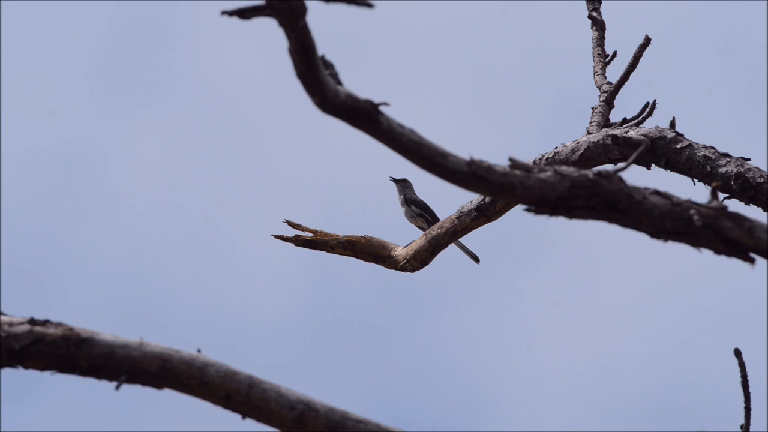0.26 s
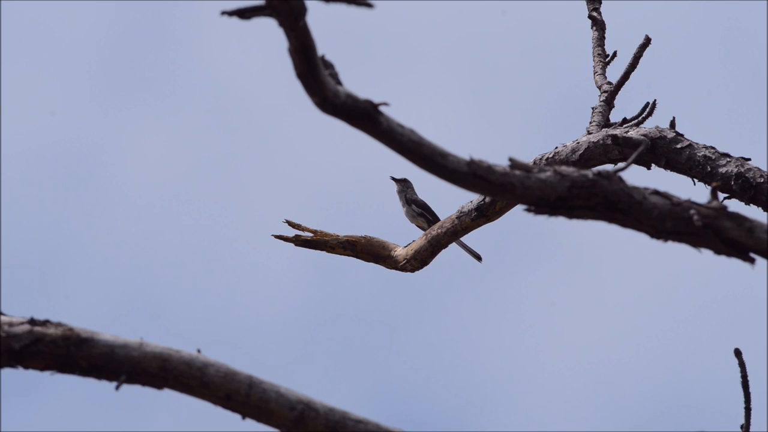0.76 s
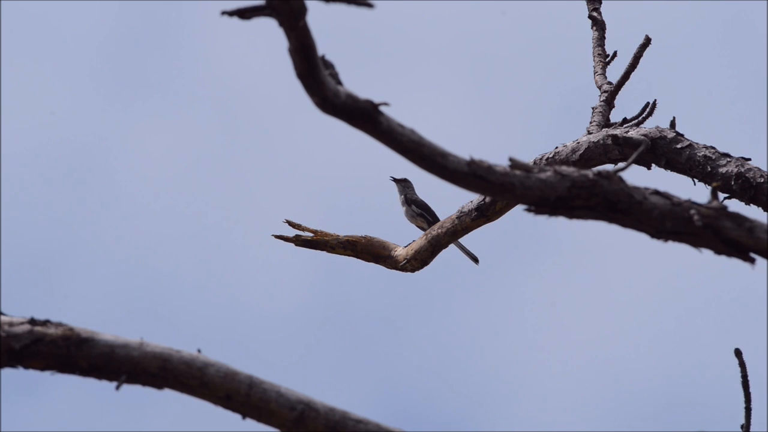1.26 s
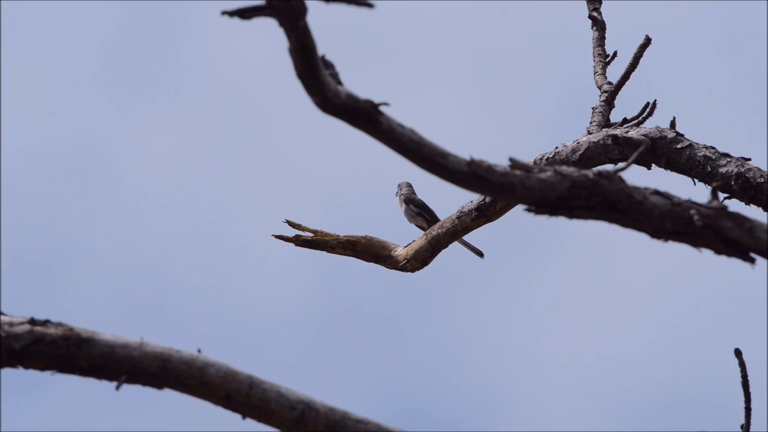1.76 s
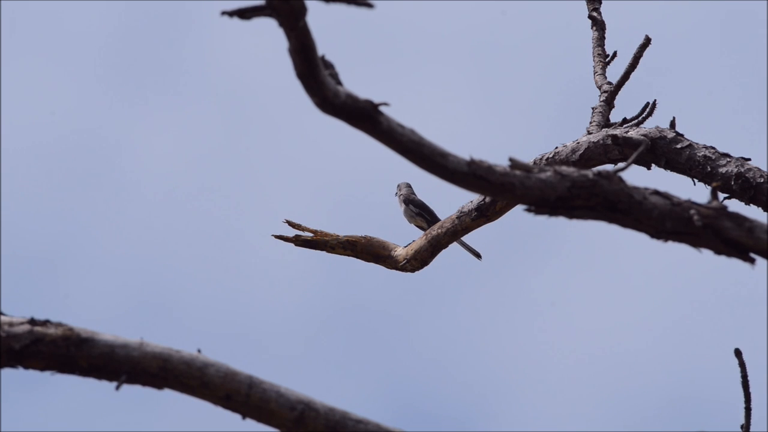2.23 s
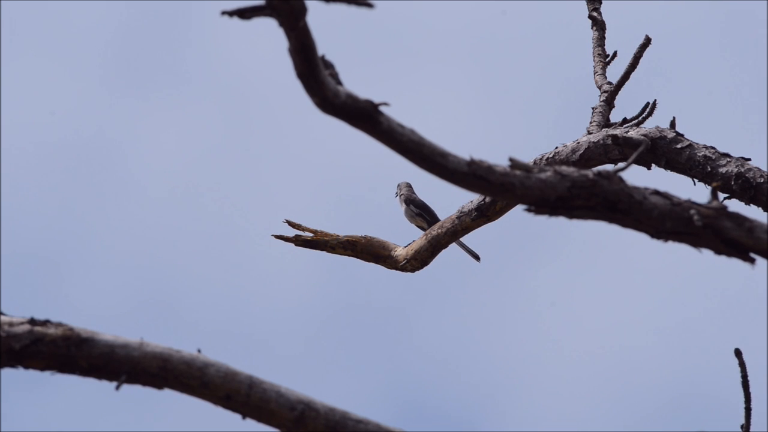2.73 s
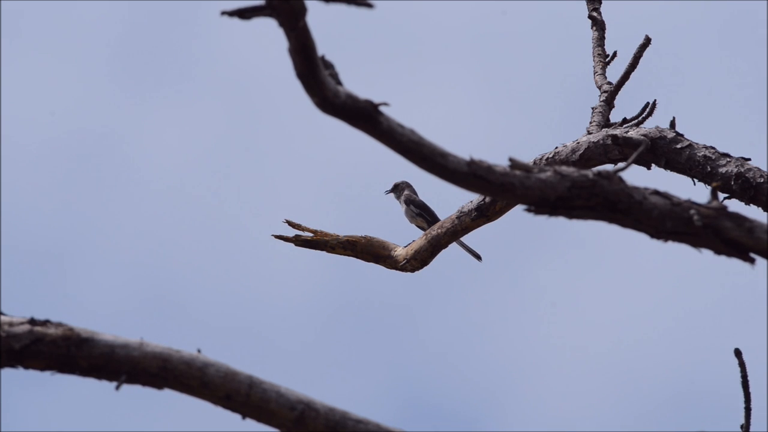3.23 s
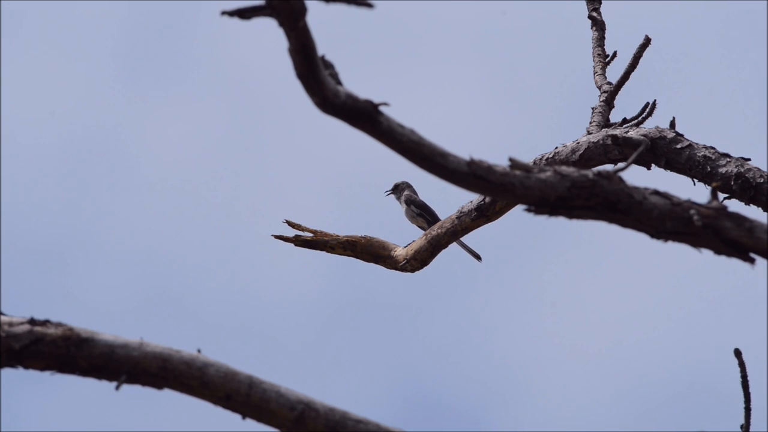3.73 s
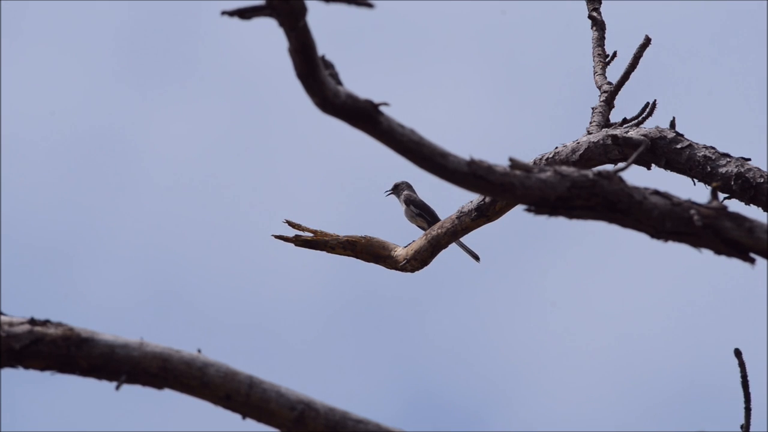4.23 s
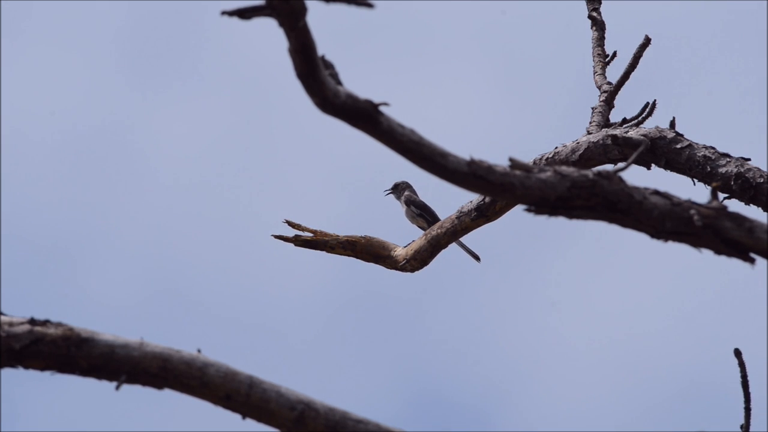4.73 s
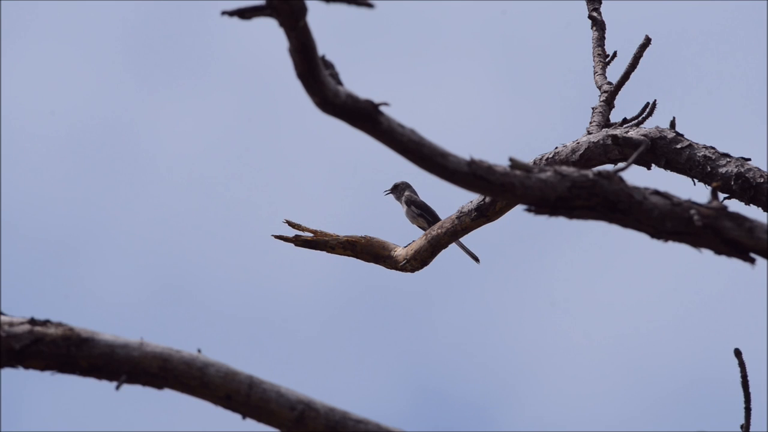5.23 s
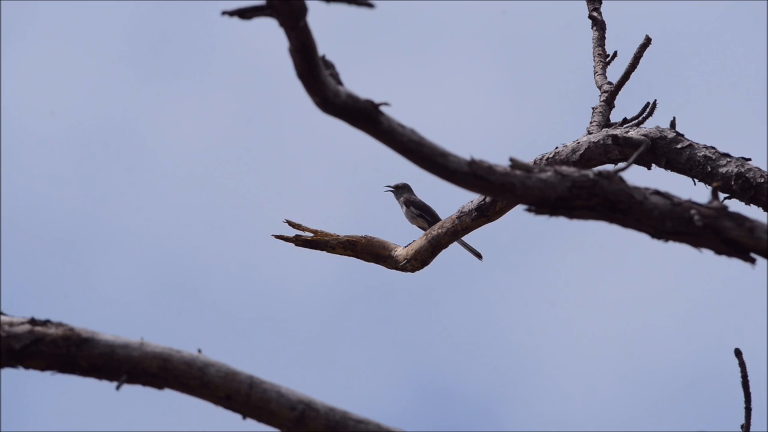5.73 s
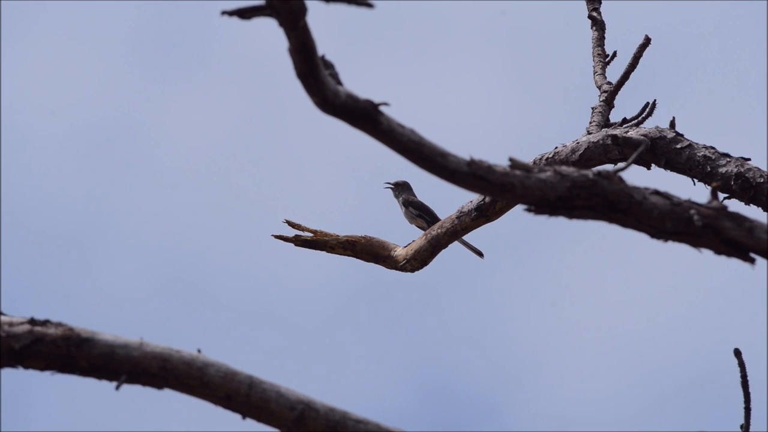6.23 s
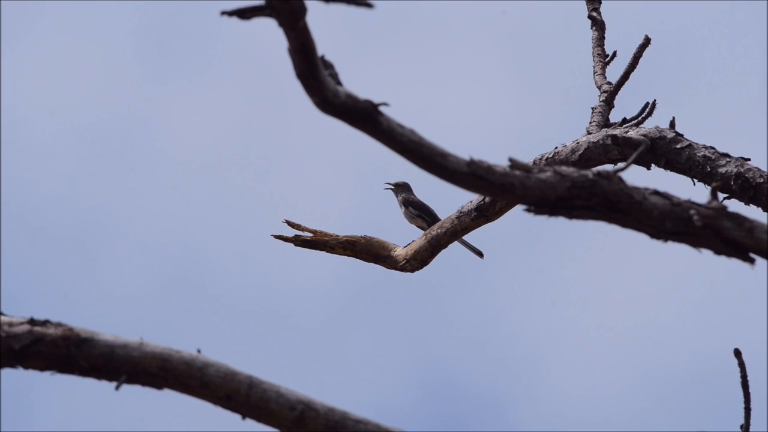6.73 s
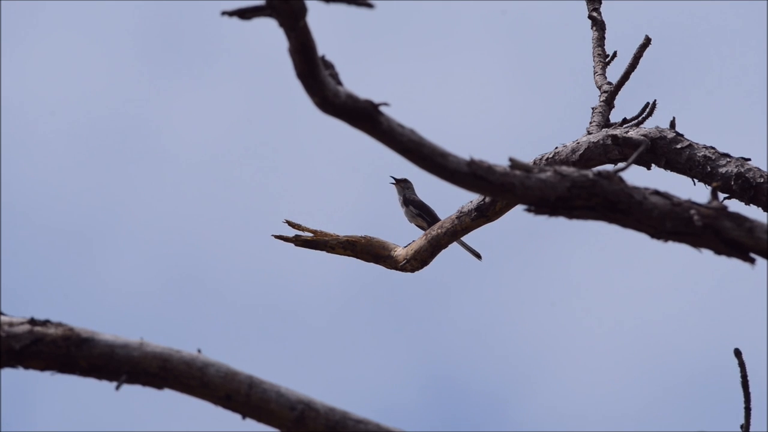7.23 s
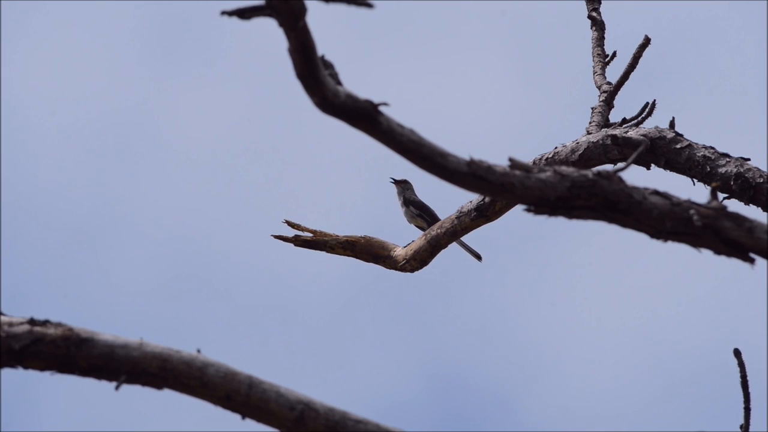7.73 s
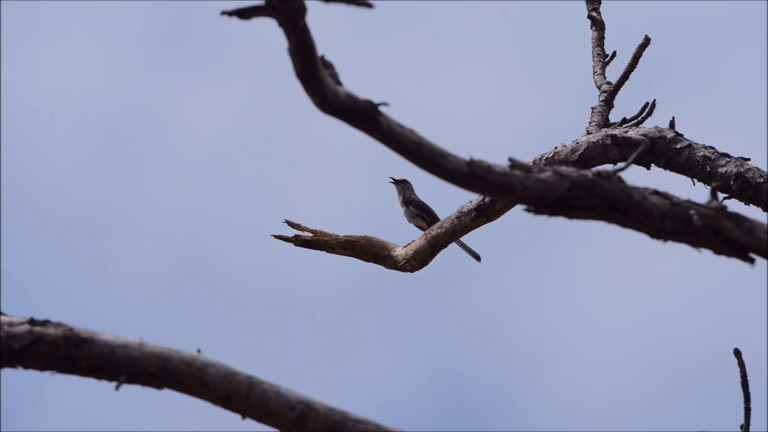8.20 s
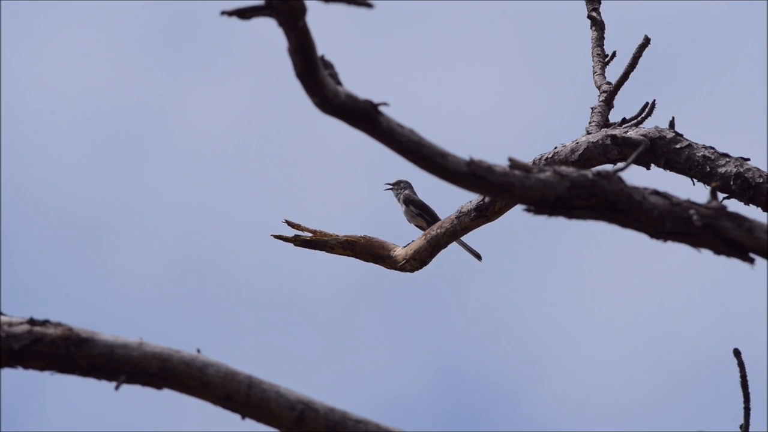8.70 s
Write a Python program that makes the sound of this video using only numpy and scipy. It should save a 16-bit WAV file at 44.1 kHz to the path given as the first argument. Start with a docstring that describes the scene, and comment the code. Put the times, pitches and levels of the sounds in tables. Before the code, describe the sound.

Rapid bird chips and repeated warbles give way to sliding whistles, then harsh two-part scolds, over faint insects and growing wind rumble.

```python
"""A low quavering note of a mockingbird's song, already under way, then its chips, warbles, one sharp call,
three long falling whistles and three rasping scolds. Overtone stacks pass a throat band; rough notes add hiss.
Trees scatter the song and a far edge returns it. Low noise in gusts is wind on the microphone. Pure slurs are
other birds, but for one, the far tree line's late return of the last whistle. Narrow noise in pulses is two
high insects, short noise bursts are dry ticks; shaped noise is open air."""
import sys
import numpy as np
from scipy import signal
from scipy.fft import rfft, irfft
from scipy.io import wavfile
from scipy.ndimage import uniform_filter1d, map_coordinates

SR = 44100
rng = np.random.default_rng(int(sys.argv[2]) if len(sys.argv) > 2 else 0)


def unload_audio(sound):
    """Save the sound as a 16-bit wav file, at the path given as the first command line argument."""
    columns = np.transpose(np.atleast_2d(sound))
    # keep every value between -1 and 1, then stretch to whole-number steps
    steps = np.round(np.clip(columns, -1, 1) * 32767)
    wavfile.write(sys.argv[1], SR, steps.astype(np.int16))


N = 395136

TOP_HZ = 15800


def undb(db):
    """Amplitude ratio of a level in dB."""
    return 10 ** (np.asarray(db) / 20)


def unit(x):
    """Scale to an RMS of 1."""
    return x / np.sqrt(np.mean(x ** 2) + 1e-18)


def add(track, s, sound):
    """Mix a sound into a track from s seconds on."""
    i = max(int(s * SR), 0)
    part = sound[:max(len(track) - i, 0)]
    track[i:i + len(part)] += part


def colour(x, points):
    """Filter by a (Hz, dB) outline that falls away below its first and above its last point."""
    hz, db = np.transpose(points)
    f = np.maximum(np.fft.rfftfreq(len(x), 1 / SR), 1)
    gain = undb(np.interp(np.log(f), np.log(hz), db))
    gain = gain * np.minimum(hz[-1] / f, 1) ** 4 * np.minimum(f / hz[0], 1)
    return irfft(rfft(x) * gain, len(x))


def walk(n, rate):
    """Smooth random curve through `rate` random knots per second."""
    knots = rng.standard_normal(int(n / SR * rate) + 4)
    return map_coordinates(knots, [np.arange(n) / SR * rate], order=2, mode="nearest")


def arch(u, edge):
    """Swell and fade over the share `edge` at both ends of u = 0..1."""
    return np.sin(np.pi / 2 * np.clip(np.minimum(u, 1 - u) / edge, 0, 1))


def contour(rows):
    """Join the rows of a curve sample by sample; return its start and its columns."""
    s, *columns = np.transpose(rows)
    s = np.sort(s)
    t = np.arange(s[0], s[-1], 1 / SR)
    return s[0], [np.interp(t, s, c) for c in columns]


def mockingbird(lead_s=.4):
    """All syllables among the trees; the lead lets the song be under way at the start."""
    lead = int(lead_s * SR)
    song = np.zeros(N + lead)
    for s, sound in [*warbles(), *scolds(), *chips(), *quavers(), *sharp_call(), *whistles()]:
        add(song, s + lead_s, sound)
    return trees(song)[lead:]


def syrinx(hz, db, slope_db, rough, jitter=0.018, shimmer=0.6, rasp=0.7, waver=0.0042,
           beak_hz=3300, beak_octaves=0.23, beak_db=15):
    """The membranes' overtones pass the throat; forced, rough notes shake, hiss and ring the beak's resonance."""
    # broad band passed by throat and beak: freq_hz, gain_db
    throat = [(700, -26), (1150, -8), (1450, -10), (1700, -2), (2000, 2.5), (2300, 9), (3200, 4),
              (3700, -2), (4300, -7.5), (5200, -3.5), (7000, -4.5), (11000, -12), (15000, -19)]
    throat_hz, throat_db = np.transpose(throat)
    n = len(hz)
    shaken_hz = hz * (1 + waver * walk(n, 122.7) + jitter * rough * walk(n, 900))
    phase = 2 * np.pi * np.cumsum(shaken_hz) / SR
    k = np.arange(1, 15)[:, None]  # overtone numbers
    ring_db = beak_db * rough * np.exp(-(np.log2(k * hz / beak_hz) / beak_octaves) ** 2)
    pass_db = np.interp(np.log(k * hz), np.log(throat_hz), throat_db)
    size = undb(slope_db * np.log2(k) + ring_db + pass_db) * (k * hz < TOP_HZ)
    tone = (size * np.sin(k * phase)).sum(0) / np.sqrt((size ** 2).sum(0) / 2 + 1e-18)
    hiss_band = [(1500, -24), (2500, -10), (beak_hz, 0), (3800, -3), (4500, -16), (7500, -18), (15000, -32)]
    hiss = unit(colour(rng.standard_normal(n), hiss_band))
    sound = tone * (1 + shimmer * rough * walk(n, 700)) + rasp * rough ** 2 * hiss
    return sound * undb(db) * arch(np.linspace(0, 1, n), 0.00056 * SR / n)  # 0.56 ms edges


def warbles(slur_s=.023, slur_from_hz=1920, slur_top_hz=2390, slur_db=-2, onset_db=11,
            quaver_s=.088, from_hz=2010, end_hz=1640, sink=1.3, scoop=0.12, pinch_db=11,
            quaver_db=0.15, fade_db=10, slope_db=-27, edge_db=14, rough=0.26):
    """A slur breaks into four sinking, ever shallower scoops; between them the pinched air turns the tone edgy."""
    # warbles: break_s, level_db, pitch_factor, length_factor, end_fade_db (negative: softer towards the end)
    warble_table = [(0.539, -19.5, 1.044, 0.77, -10), (1.486, -21.5, 1.03, 0.86, -5.5),
                    (1.627, -23, 1.043, 0.88, -4), (1.763, -23.5, 1.024, 0.82, -2),
                    (1.905, -22.5, 1.03, 0.83, -6), (2.324, -23.5, 1.015, 0.98, -9),
                    (2.468, -26.5, 0.99, 0.97, -3), (2.619, -22.5, 0.99, 0.94, -8),
                    (3.019, -24, 1, 0.97, -6.5), (3.181, -26.5, 1, 0.99, -2), (3.323, -24.5, .98, 1, -4),
                    (3.713, -25, 1.005, 0.96, -2), (3.873, -25.5, 1, 0.99, -4.5)]
    for s, level_db, pitch, stretch, end_fade_db in warble_table:
        v = np.linspace(0, 1, int(slur_s * stretch * SR))
        slur_hz = slur_from_hz + (slur_top_hz - slur_from_hz) * v
        slur_level_db = slur_db - onset_db * ((1 - v) ** 2 + v ** 16)
        slur_slope_db = -9 - 8 * v

        u = np.linspace(0, 1, int(quaver_s * stretch * SR), endpoint=False)
        turn = 4 * u % 1
        pinch = np.cos(np.pi * turn) ** 2 * (1 - .7 * u)
        sink_hz = end_hz + (from_hz - end_hz) * (1 - u) ** sink
        quaver_hz = sink_hz * (1 + scoop * (1 - u) * (2 * turn - 1))
        quaver_level_db = quaver_db + end_fade_db * u - fade_db * u ** 3 - pinch_db * pinch
        quaver_slope_db = slope_db + edge_db * (pinch * u + u ** 3)

        hz = np.concatenate([slur_hz, quaver_hz])
        db = np.concatenate([slur_level_db, quaver_level_db])
        slope = np.concatenate([slur_slope_db, quaver_slope_db])
        n = len(hz)
        sway, drift_db = 1 + .011 * walk(n, 60), 1.5 * walk(n, 130)
        yield s - slur_s * stretch, syrinx(pitch * hz * sway, level_db + db + drift_db, slope, rough)


def chips(end_hz=2764, bend=0.76, duty=0.97, fade_db=7, weak_db=10.5, weak_hz=3020, peak_at=0.629,
          weak_length=.65):
    """Fast downward flicks; effort swells and eases through a burst, making flicks higher, longer and louder."""
    # bursts: start_s, length_s, chips_per_s, top_hz (full effort), level_db (full effort)
    burst_table = [(-.22, 0.054, 59, 3520, -12), (-.076, 0.066, 61, 3550, -11.5),
                   (.606, .064, 60, 3680, -13.5), (.759, 0.0643, 65, 3455, -12),
                   (.914, .062, 64, 3896, -13)]
    for s, length, rate, top_hz, db in burst_table:
        for k in range(round(length * rate)):
            effort = 1 - ((k + .5) / (length * rate) / peak_at - 1) ** 2 * 1.37
            chip_s = duty / rate * (weak_length + (1 - weak_length) * effort)
            u = np.linspace(0, 1, int(chip_s * SR))
            start_hz = (weak_hz + (top_hz - weak_hz) * effort) * (1 + 0.015 * rng.standard_normal())
            hz = start_hz + (end_hz - start_hz) * u ** bend
            chip_db = db - weak_db * (1 - effort) - fade_db * u ** 2
            yield s + k / rate, flick(hz, chip_db) * arch(u, edge=0.23)


def flick(hz, db, slope_db=-8, spray_db=-26):
    """A hard-blown note that throws a spray of treble."""
    spray_band = [(2500, -20), (4000, 1), (6500, 13), (9000, -9), (15000, -22)]
    spray = unit(colour(rng.standard_normal(len(hz)), spray_band))
    return syrinx(hz, db, slope_db, rough=0.47) + undb(db + spray_db) * spray


def sharp_call():
    """A double flick that lands on a short held note."""
    # call contour: time_s, pitch_hz, level_db
    call = [(3.567, 3160, -28), (3.574, 2425, -21.5), (3.577, 3070, -24), (3.582, 2583, -22.5),
            (3.59, 2560, -24), (3.598, 2560, -30)]
    start, (hz, db) = contour(call)
    yield start, flick(hz, db)


def quavers(scoop=0.0594, dip=0.062, gap_db=15):
    """A sinking note chopped into scoops: pitch lifts where the air is pinched off and dips in between."""
    # low notes answering the chips: start_s, length_s, start_hz, end_hz, level_db, quavers_per_s
    quaver_table = [(-.012, 0.079, 2380, 2005, -28, 82), (0.684, 0.066, 2180, 1950, -25.5, 92),
                    (0.828, .072, 2320, 1924, -24.5, 68), (0.981, 0.0753, 2125, 1880, -27, 66)]
    for s, length, start_hz, end_hz, db, rate in quaver_table:
        u = np.linspace(0, 1, int(length * SR))
        pinch = np.cos(np.pi * rate * length * u) ** 2
        sink_hz = end_hz + (start_hz - end_hz) * (1 - u) ** 2
        hz = sink_hz * (1 + (scoop + dip) * np.sqrt(pinch) - dip)
        note = syrinx(hz, db + 0.5 - gap_db * pinch ** 2, slope_db=-18, rough=0.19)
        yield s, note * arch(u, edge=0.16)


def whistles(flare_s=.058, flare_from_hz=2010, flare_top_hz=2345, sink_from_hz=2220,
             swell_db=8, release_s=0.034, release_db=17, drop_hz=190, pure_db=-19, slope_db=-12,
             end_db=-41, flutter_db=2.0, wobble=0.0079, rough=0.14):
    """A near-pure tone flares up and is let go; a softer one swells and sinks ever more slowly, fluttering."""
    # calls: flare_peak_s, flare_db, sink_delay_s (from the peak), sink_length_s, end_hz, sink_db,
    # sag (1 sinks evenly, more levels off sooner)
    call_table = [(4.505, -17.5, 0.07, .292, 1700, -30, 1.6), (5.184, -17.5, 0.081, .28, 1665, -32, 1.45),
                  (5.938, -15.5, .11, .325, 1632, -26, 1.7)]
    for s, flare_db, pause, length, end_hz, sink_db, sag in call_table:
        t = np.arange(-flare_s, release_s, 1 / SR)
        before, after = np.maximum(-t / flare_s, 0), np.maximum(t / release_s, 0)
        flare_hz = flare_top_hz - (flare_top_hz - flare_from_hz) * before ** 1.19 - drop_hz * after
        hz = flare_hz * (1 + wobble * walk(len(t), 59))
        db = flare_db - swell_db * before ** 2 - release_db * after + 0.43 * walk(len(t), 75)
        flare = syrinx(hz, db, pure_db, rough=0.081)
        yield s - flare_s, flare * arch(np.linspace(0, 1, len(t)), edge=0.51)

        u = np.linspace(0, 1, int(length * SR))
        sink_hz = end_hz + (sink_from_hz - end_hz) * (1 - u) ** sag
        hz = sink_hz * (1 + wobble * walk(len(u), 30.35))
        db = sink_db + (end_db - sink_db) * u + flutter_db * walk(len(u), 71.7)
        sinking = syrinx(hz, db, slope_db, rough)
        yield s + pause, sinking * arch(u, edge=.03) * np.minimum(u / 0.094, 1)


def scolds():
    """A first note held and then dropped, a second dropping into a rasp."""
    # note shapes: from_drop_s, pitch_hz, level_db, overtone_slope_db_per_octave, roughness (about 0-1)
    short_scold = [(-.048, 1545, -12.5, -17, .05), (-.02, 1680, -1, -18, .05), (-.003, 1717, -5, -13, .05),
                   (.003, 1458, -4.5, -34, .2), (.014, 1149, -.5, -8.5, 0.22), (.028, 1133, -2.5, -4, 0.1),
                   (.036, 1033, -3, -3, 0.45), (.052, 991, -6, -4, .55), (.072, 935, -5.5, -1, .5)]
    long_scold = [(-.125, 1721, -26, -11, 0.16), (-.09, 1910, -16, -8.5, 0.17),
                  (-.008, 1853, -6, -4.5, .14), (.001, 1762, -8.5, -5, 0.37), (.008, 1459, -1.5, -9, 0.59),
                  (.02, 1177, -6.5, -3, 0.63), (.042, 1042, -6.5, -3.5, 0.96), (.075, 929, -8.5, -1, .85),
                  (.118, 700, -12, 0, 1.01), (.145, 630, -31, -5, .8)]
    # when sung: drop_s, level_db, pitch_factor, length_factor, end_fade_db (negative: softer towards the end)
    short_times = [(7.003, -30, 1.04, 0.81, -5.5), (7.797, -30, 1.006, 1, -1),
                   (8.631, -29.5, 1.02, 1.05, -4)]
    long_times = [(7.207, -25, 0.97, 1.11, -1), (8.005, -24.5, 0.98, 1.065, 0), (8.874, -23, 1.01, 1.08, 0)]
    yield from repeats(short_scold, short_times)
    yield from repeats(long_scold, long_times)


def repeats(shape, table):
    """One learned syllable, each time a little higher or lower, faster or slower, and never quite alike."""
    for s, level_db, pitch, stretch, end_fade_db in table:
        start, (hz, db, slope_db, rough) = contour(np.array(shape) * [stretch, pitch, 1, 1, 1])
        n = len(hz)
        sway, drift_db = 1 + .01 * walk(n, 40), 1.6 * walk(n, 130)
        db = db + level_db + drift_db + end_fade_db * np.linspace(0, 1, n)
        yield s + start, syrinx(hz * sway, db, slope_db, np.clip(rough, 0, 1))


def trees(x, branch_s=0.0047, branch_db=-15, trunks_db=-14, trunks_t60=0.23, scatter_db=-12, t60=0.48,
          echo_s=.35, echo_db=-18, far_db=-27, far_t60=0.41):
    """Near branch and trunks reflect, foliage scatters, the far tree line adds an echo and its own tail."""
    t = np.arange(SR) / SR
    # the fifth power makes the noise sparse
    trunks = rng.standard_normal(SR) ** 5 * undb(-60 * t / trunks_t60) * (t > branch_s)
    near = rng.standard_normal(SR) * undb(-60 * t / t60) * np.minimum(t / 0.035, 1)
    far = rng.standard_normal(SR) * undb(-60 * np.abs(t - echo_s) / far_t60) * (t > echo_s)
    tails = undb(trunks_db) * unit(trunks) + undb(scatter_db) * unit(near) + undb(far_db) * unit(far)
    response = tails / np.sqrt(SR)
    add(response, 0, np.ones(1))  # direct sound
    add(response, branch_s, undb([branch_db]))
    # the beak beams its high notes at the tree line, so they come back strongest
    highpass = signal.butter(2, 2600, "high", fs=SR, output="sos")
    beam = signal.sosfilt(highpass, signal.unit_impulse(SR // 700))
    add(response, echo_s, undb(echo_db) * beam)
    return signal.fftconvolve(x, response)[:len(x)]


def thin_slurs(seep_s=.03, seep_from_hz=9000, seep_to_hz=6900, seep_db=-41.5):
    """Gliding sines blurred by the foliage: other birds' slurs, contact calls and trill, and one late echo."""
    # thin pure slurs, one of them (6.28 s) the far tree line's late return of the last whistle:
    # start_s, length_s, start_hz, end_hz, level_db
    slur_table = [(2.782, 0.19, 6620, 6570, -42), (2.955, 0.076, 6700, 6730, -29),
                  (3.035, 0.052, 6650, 6550, -40), (4.125, 0.073, 3750, 4970, -50),
                  (5.83, 0.22, 3940, 3920, -56), (6.236, .03, 3160, 3080, -44),
                  (6.28, 0.242, 2276, 2192, -41), (6.635, 0.042, 3655, 3800, -43)]
    # a small bird's high falling contact calls: start_s
    seep_starts = [1.037, 4.355, 4.587, 6.087, 8.54, 8.671]
    seeps = [(s, seep_s, seep_from_hz, seep_to_hz, seep_db) for s in seep_starts]
    out = np.zeros(N)
    for s, length, start_hz, end_hz, db in [*slur_table, *seeps, *trill()]:
        u = np.linspace(0, 1, int(length * SR))
        hz = (start_hz + (end_hz - start_hz) * u) * (1 + 0.0029 * walk(len(u), 169))
        level = undb(db + 2.1 * walk(len(u), 60)) * arch(u, edge=0.12)
        add(out, s, level * np.sin(2 * np.pi * np.cumsum(hz) / SR))
    return trees(out, trunks_db=-4.5, scatter_db=-13.5, t60=0.54, echo_db=-31, far_db=-37)


def trill(start_s=6.15, first_gap_s=.315, trill_gap_s=.056, gap_ratio=.7, count=18, duty=0.474,
          linger=0.305, centre_hz=4170, lift_hz=170, sweep_hz=600, slow_db=-50, fast_db=-44.0):
    """Notes speed up like a bouncing ball; the quicker they come, the shorter, steeper and louder they are."""
    s = start_s
    for k in range(count):
        gap = trill_gap_s + (first_gap_s - trill_gap_s) * gap_ratio ** k
        haste = trill_gap_s / gap
        length = (duty + linger * (1 - haste)) * gap
        hz, sweep = centre_hz + lift_hz * haste, sweep_hz * haste
        db = slow_db + (fast_db - slow_db) * haste + 1.7 * rng.standard_normal()
        yield s, length, hz - sweep / 2, hz + sweep / 2, db
        s += gap


def ticks(t60=0.014):
    """Tiny broad cracks: noise dying away within milliseconds."""
    # faint dry ticks close by: start_s, level_db (before the filter)
    tick_table = [(4.044, -32.5), (4.082, -29.5), (4.103, -29), (4.118, -30), (4.452, -35), (4.838, -28)]
    out, t = np.zeros(N), np.arange(SR // 40) / SR
    for s, db in tick_table:
        add(out, s, undb(db - 60 * t / t60) * rng.standard_normal(len(t)))
    return colour(out, [(700, 10), (3500, 4.0), (9000, 2.5), (14000, -14)])


def insect(centre_hz=10430, width_hz=420, db=-50, length=0.082, lag_s=0.):
    """Short scrapes, at a pace that drifts, swell and fade in a narrow wing resonance."""
    # chirping pace: time_s, chirps_per_s
    pace_table = [(0, 5.9), (1.65, 4.45), (2.68, 5.45), (3.19, 3.75), (3.71, 4.9), (5.41, 5.72),
                  (7.5, 4.17), (7.65, 5.35), (8.96, 5.6)]
    t = np.arange(N) / SR
    pace = np.interp(t, *np.transpose(pace_table))
    cycles = np.cumsum(pace) / SR - lag_s * pace
    from_chirp_s = ((cycles + .5) % 1 - .5) / pace
    scrapes = np.cos(np.pi * np.clip(from_chirp_s / length, -.5, .5)) ** 2 * undb(3.1 * walk(N, 3.9))
    ring = (walk(N, width_hz) + 1j * walk(N, width_hz)) * np.exp(2j * np.pi * centre_hz * t)
    return undb(db) * (scrapes + 0.32) * unit(ring.real)  # 0.32: steady ring between chirps


def wind(sub_hz=55, split_hz=175, brighten=0.72, sub_share=0.62, sub_db=-1, mild_db=-23,
         buffet_db=2.5, buffet_rate=22, gain_db=-0.94):
    """Turbulence at the microphone: stronger gusts hold smaller eddies, so weight moves up from the deep bass."""
    # turbulence outline: freq_hz, gain_db
    wind_band = [(12, -53), (20, -18.5), (70, 1), (97, 2), (166, -7), (229, -14.5), (500, -40.5),
                 (650, -61), (1100, -120)]
    gust_db = gusts() + buffet_db * walk(N, buffet_rate)
    over_db = gust_db - mild_db
    swirl = unit(colour(rng.standard_normal(N), wind_band))
    swirl /= np.sqrt(uniform_filter1d(swirl ** 2, SR // 16))  # the gust alone sets the slow swell
    deep = signal.sosfiltfilt(signal.butter(2, sub_hz, fs=SR, output="sos"), swirl)
    coarse = signal.sosfiltfilt(signal.butter(2, split_hz, fs=SR, output="sos"), swirl)
    fine = (swirl - coarse) * undb(brighten * np.clip(over_db, -15, 11) + 4.43 * walk(N, 50) - 2.0)
    heave = deep * undb(sub_db - sub_share * over_db)
    out = (heave + coarse - deep + fine) * undb(gust_db + gain_db) + eddies()
    # the microphone's cover cushions and dulls the hardest pushes
    cushioned = .95 * np.tanh(out / .95)
    return signal.sosfilt(signal.butter(4, 580, fs=SR, output="sos"), cushioned)


def gusts(rise_db_per_s=245, fall_db_per_s=184, lull_db=-47):
    """Wind strength in dB: each gust rises out of the lull, builds or slackens, and dies away."""
    # gusts: start_s, length_s, level_db (before the wind gain), build_db
    gust_table = [(0.204, 0.13, -38, -1), (.58, 0.12, -32.5, 3.5), (0.78, 0.46, -23.5, -3),
                  (1.407, 0.25, -27.5, 3), (1.788, 0.05, -19, 0), (1.987, 0.024, -25, 0.5),
                  (2.987, 0.19, -25.5, -8), (3.776, 0.094, -35, 5), (4.1, 1.13, -22.5, 2.5),
                  (5.26, 0.73, -22, -2), (6.108, .17, -27, -0.5), (6.315, 0.022, -14, -1.5),
                  (6.71, 0.76, -20.5, 6.5), (7.625, 0.55, -20, 6.5), (8.196, 0.45, -17.5, 9),
                  (8.693, 0.24, -10, -2)]
    t = np.arange(N) / SR
    strength_db = np.full(N, float(lull_db))
    for s, length, db, build_db in gust_table:
        rise_db = rise_db_per_s * np.maximum(s - t, 0)
        fall_db = fall_db_per_s * np.maximum(t - s - length, 0)
        build = build_db * np.clip((t - s) / length, 0, 1)
        strength_db = np.maximum(strength_db, db + build - (rise_db + fall_db))
    return strength_db


def eddies():
    """Passing vortices: each a sharp suck between two softer pushes."""
    # hard eddies: centre_s, peak_db (before the cover), pitch_hz
    eddy_table = [(6.335, -1.5, 175), (8.1, 0, 144), (8.648, -3.5, 172)]
    t = np.arange(N) / SR
    out = np.zeros(N)
    for s, db, hz in eddy_table:
        u = (np.pi * hz * (t - s)) ** 2
        out -= undb(db) * (1 - 2 * u) * np.exp(-u)
    return out


def air(level_db=-41):
    """Hiss of the open air, all but steady."""
    # hiss outline: freq_hz, gain_db
    air_band = [(76, -22), (130, 1.5), (273, -1.5), (362, -3), (489, -4.5), (598, -5), (2250, -12),
                (2490, -12), (4190, -16), (4830, -16), (9180, -15), (15800, -28)]
    return undb(level_db + 0.1 * walk(N, 2.39)) * unit(colour(rng.standard_normal(N), air_band))


def scene():
    """Sum of all sources; the second insect is lower, softer and slightly late."""
    insects = insect() + insect(centre_hz=9450, width_hz=680, db=-55.5, length=0.085, lag_s=0.075)
    return (mockingbird() + thin_slurs() + ticks() + insects + wind() + air())[None]


def record(dry):
    """Steep low-pass at TOP_HZ."""
    return signal.sosfilt(signal.ellip(10, .2, 80, TOP_HZ, fs=SR, output="sos"), dry)


dry = scene()
out = record(dry)
unload_audio(out)
```